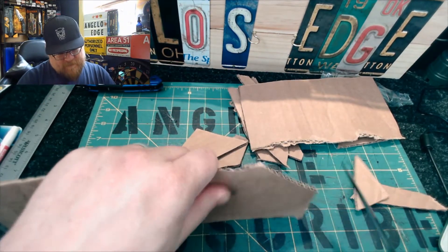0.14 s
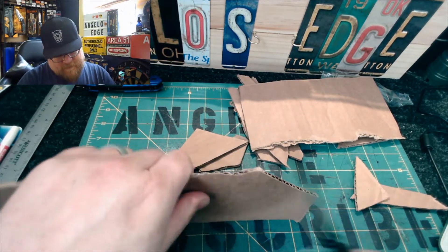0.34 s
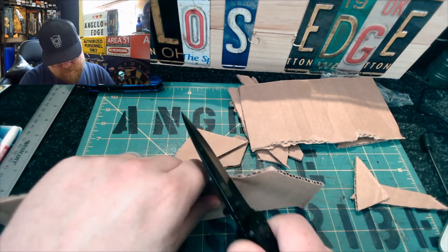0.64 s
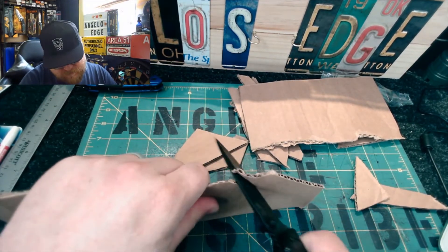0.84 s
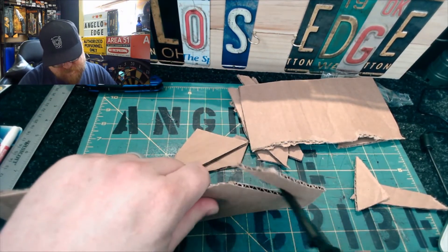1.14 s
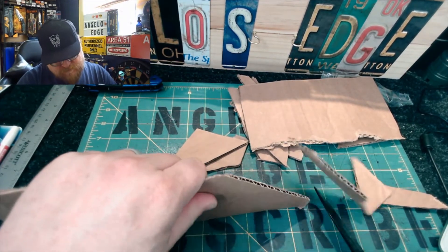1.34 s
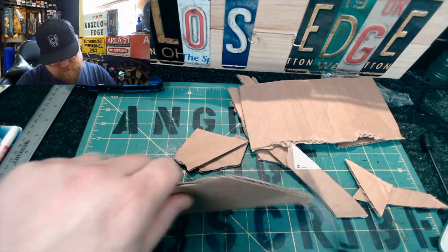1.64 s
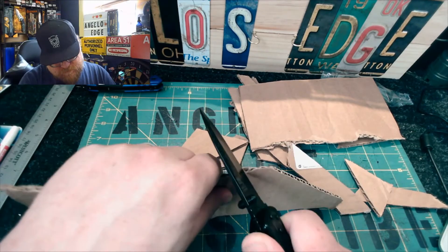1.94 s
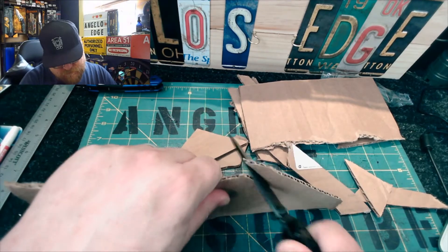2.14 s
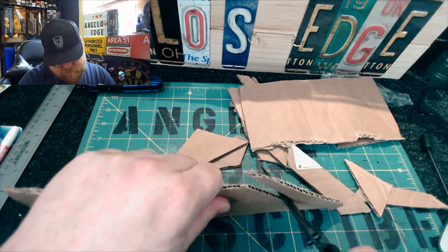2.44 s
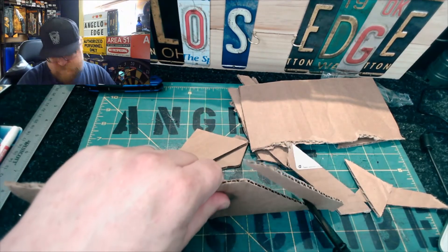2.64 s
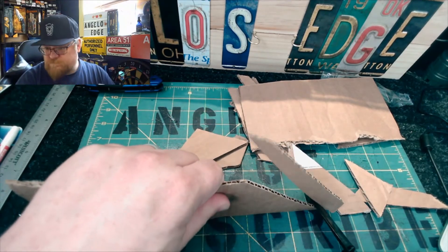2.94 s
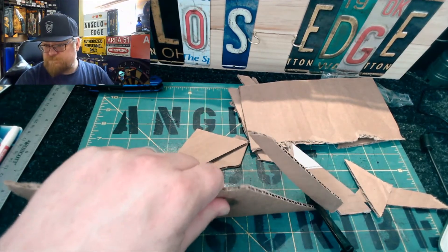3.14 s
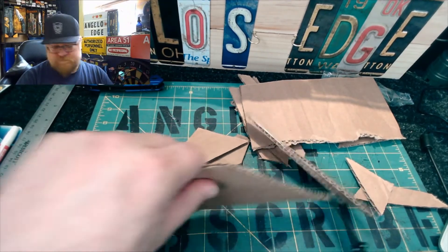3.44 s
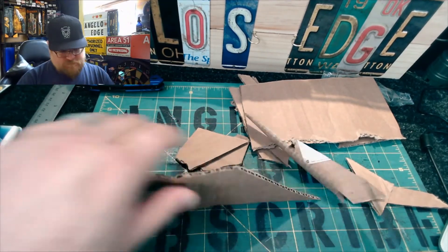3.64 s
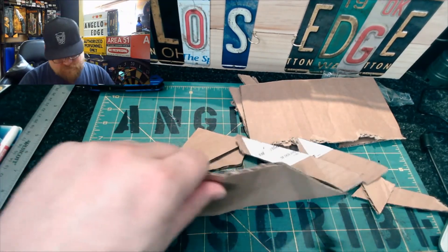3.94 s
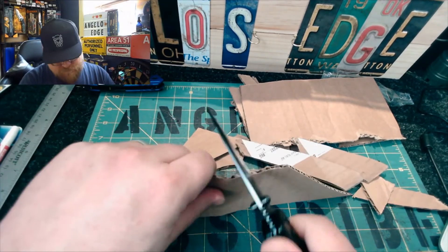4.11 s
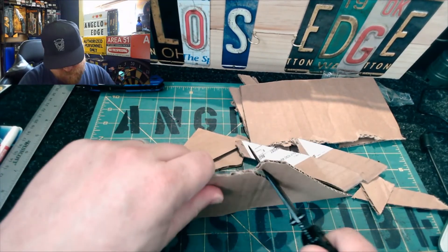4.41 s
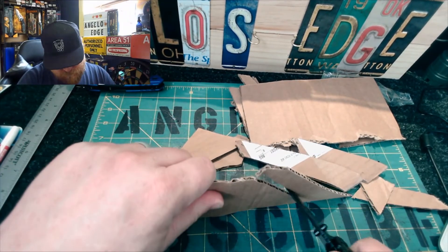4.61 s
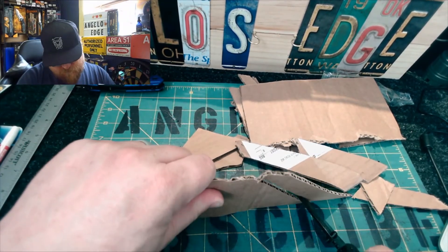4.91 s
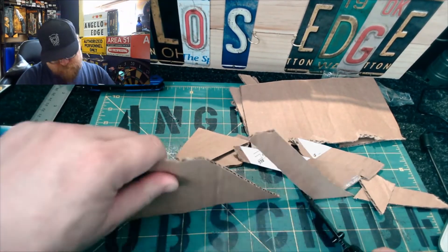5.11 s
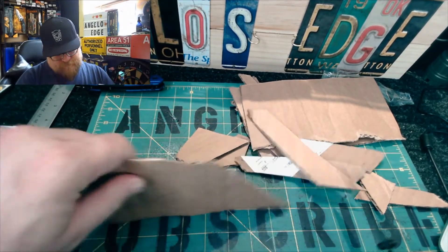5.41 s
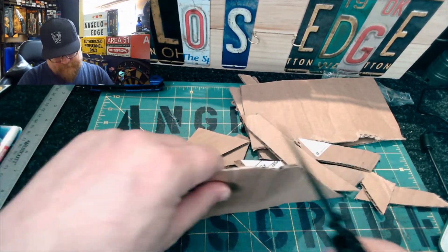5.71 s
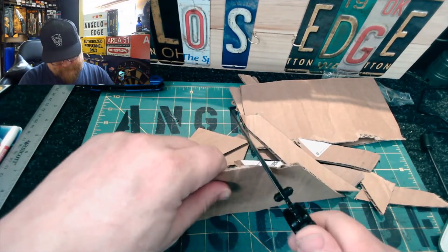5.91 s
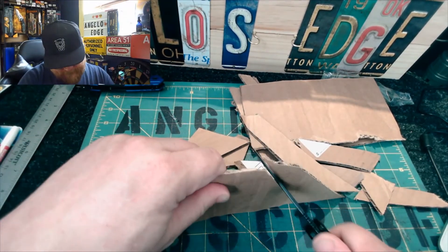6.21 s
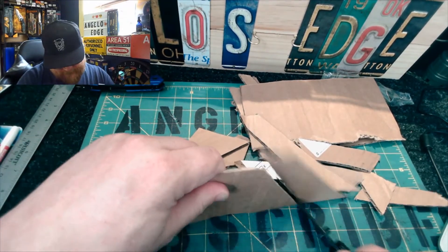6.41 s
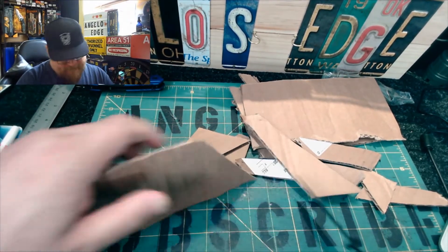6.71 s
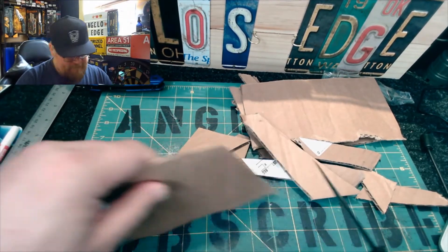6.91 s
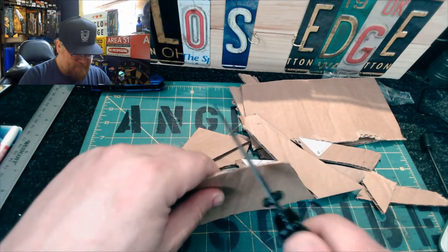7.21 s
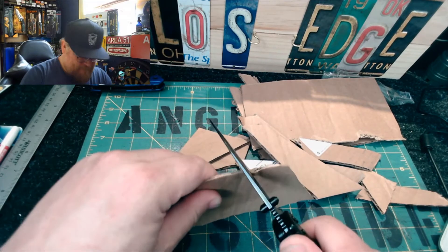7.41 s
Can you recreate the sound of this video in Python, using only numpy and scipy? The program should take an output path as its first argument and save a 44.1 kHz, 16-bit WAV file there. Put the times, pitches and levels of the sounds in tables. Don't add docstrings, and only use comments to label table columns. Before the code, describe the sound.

Close to a stereo microphone in a quiet room, a knife slices corrugated cardboard on a desk. Gritty crackling rasps swell at each flute, pause, then start again. Small tips snap off, offcuts drop and slide, and palms thump the desk softly over a low hand rumble. The sharpest, loudest crack comes shortly after six seconds, followed by lighter ticks and short cuts.

```python
import sys
import numpy as np
from scipy import signal
from scipy.io import wavfile
from scipy.ndimage import uniform_filter1d

SR = 44100
rng = np.random.default_rng(int(sys.argv[2]) if len(sys.argv) > 2 else 0)


def to_wav(s):
    ch = np.atleast_2d(s).T
    pcm = np.round(np.clip(ch, -1, 1) * 32767)
    wavfile.write(sys.argv[1], SR, pcm.astype(np.int16))


def convert_level_to_amplitude(level_db):
    exponent = np.asarray(level_db, float) / 20
    return 10 ** exponent


N = 333287

# (f/Hz, width/Hz, level/dB)
DESK_MODES = [(108, 30, -1.5), (135, 35, 2.5), (168.6, 36.8, -2.5), (244, 23, -11), (314.2, 24.6, -8.5),
              (399, 23, -9), (465, 57, -15.5)]


def evened(x):
    return x / np.sqrt(np.mean(x ** 2) + 1e-20)


def read(points, hz):
    f, value = np.transpose(points)
    return np.interp(np.log(hz + 1), np.log(f + 1), value)


def colour(x, points):
    hz = abs(np.fft.fftfreq(8192, 1 / SR))
    log_gain = np.log(np.maximum(convert_level_to_amplitude(read(points, hz)), 1e-4))
    taps = np.fft.ifft(np.exp(np.conj(signal.hilbert(log_gain)))).real[:4096]
    return signal.oaconvolve(x, taps)[:len(x)]


def resonate(x, hz, width):
    r = np.exp(-np.pi * width / SR)
    turn = np.exp(2j * np.pi * hz / SR)
    return 2 * signal.lfilter([1 - r], [1, -r * turn], x + 0j).real


def ring(x, modes):
    total = np.zeros(len(x))
    for k, (hz, width, db) in enumerate(modes):
        total += (-1) ** k * convert_level_to_amplitude(db) * resonate(x, hz, width)
    return evened(total)


def drift(seconds):
    size = max(round(seconds * SR), 2)
    return evened(uniform_filter1d(uniform_filter1d(rng.standard_normal(N), size), size))


def patches(hz, seconds, size=256):
    field = rng.standard_normal((N * 4 // size + 9, size // 2 + 1))
    field = uniform_filter1d(field, max(round(seconds * SR * 4 / size), 1), axis=0)
    return evened(uniform_filter1d(field, max(round(hz * size / SR), 1), axis=1)).T


def reshape(x, gain, size=256):
    overlap = size * 3 // 4
    z = signal.stft(x, nperseg=size, noverlap=overlap)[2]
    return signal.istft(z * gain[:, :z.shape[1]], nperseg=size, noverlap=overlap)[1][:N]


def room_tone():
    # (f/Hz, level/dB)
    floor = [(18, -37), (30, 1), (81, -27.5), (124, -30), (374, -33.5), (666, -32.5), (1960, -45),
             (16000, -50)]
    return convert_level_to_amplitude(-56.5) * evened(colour(rng.standard_normal(N), floor))


def effort():
    # (start t/s, length/s, edge hiss level/dB, desk weight/dB, hiss dullness/dB)
    strokes = [(0, 0.12, -52, -49, 7.5), (0.488, 0.253, -38, -1.5, -2), (0.783, 0.3, -43, 7.5, -0.5),
               (1.08, 0.25, -65.5, 10, 10.5), (1.45, 0.28, -58, -11, 3), (1.81, 0.393, -42.5, 3.5, -0.5),
               (2.243, 0.17, -38, -0.5, -10.5), (2.399, 0.43, -52, 1, -1.5), (2.825, 0.22, -53, -3, 7),
               (3.19, 0.25, -52.5, -5, 4.5), (3.981, 0.43, -43.5, 2, 0), (4.249, 0.34, -40.5, 2, -7),
               (4.575, 0.34, -51, 2, 2), (4.897, 0.12, -53.5, -5, 6.5), (5.218, 0.28, -45, -8.5, 4.5),
               (5.684, 0.214, -54.5, 11, -0.5), (5.95, .27, -35, 4, -4.5), (6.226, .13, -43, -3, 9.5),
               (6.62, .28, -54.5, -1.5, 8), (7.047, 0.26, -49, 3.5, -0.5), (7.334, 0.3, -57, -6, -9),
               (7.503, .2, -44.5, -7.5, 1)]
    # (peak t/s, build-up/s, edge hiss level/dB, desk weight/dB)
    pushes = [(.104, 0.02, -49.5, -4), (.191, .032, -41, -8), (.414, 0.029, -47, -3),
              (.476, 0.024, -39, -3), (.823, 0.059, -26.5, -6), (1.05, 0.017, -26.5, -23),
              (1.167, 0.02, -43, 2.5), (1.526, 0.14, -49, -2.5), (1.688, 0.0095, -51.5, 5),
              (1.75, 0.0067, -41.5, -1), (1.795, 0.011, -30, -5), (1.873, 0.01, -38, 2),
              (1.996, 0.018, -30, -15), (2.135, .05, -33, 2.5), (2.35, 0.054, -31, -3),
              (2.68, 0.034, -32.5, -4.5), (3.557, 0.078, -45, -1), (4.126, 0.079, -24, -1.5),
              (4.386, 0.0088, -34, -2), (4.501, .015, -42, -6), (4.626, 0.023, -38.5, -0.5),
              (5.122, 0.018, -45, -36), (5.274, 0.19, -50.5, 1), (6.498, 0.016, -50.5, -16),
              (6.729, 0.083, -42.5, -15), (7.202, 0.023, -28.5, -7.5)]
    # (peak t/s, trail/s, edge hiss level/dB, desk weight/dB)
    catches = [(.154, 0.12, -49, -8), (.512, 0.017, -29.5, -2), (.606, 0.064, -37, 1.5),
               (.858, 0.056, -27.5, -5.5), (1.186, 0.065, -39.5, -8), (1.198, 0.025, -30, -9),
               (1.613, 0.051, -48.5, -15), (1.774, 0.052, -42.5, 2.5), (1.925, 0.076, -26.5, 2.5),
               (2.421, 0.021, -37.5, -3), (3.018, 0.049, -40, 5), (3.074, 0.066, -44.5, -26),
               (3.598, 0.17, -39.5, -20), (3.818, 0.11, -55, -21), (4.16, 0.014, -33, -4),
               (4.202, 0.063, -36, -7), (4.276, 0.018, -31, 3.5), (4.686, 0.11, -36, -4.5),
               (4.73, 0.072, -34, -3), (5.178, 0.035, -41, -15), (5.242, 0.019, -40, -9),
               (5.428, 0.043, -62, -8), (5.707, 0.16, -40, -10), (5.862, 0.017, -47, 1),
               (6.264, 0.025, -33, -4), (6.388, 0.076, -44, -7), (7.03, 0.063, -72, -7),
               (7.115, 0.23, -55, -13), (7.288, 0.013, -39.5, -29)]
    # (peak t/s, half width/s, edge hiss level/dB, desk weight/dB)
    bites = [(.441, 0.0096, -40.5, -2), (.96, 0.067, -26.5, -19), (1.365, .012, -49.5, 3),
             (1.723, 0.0065, -44, -3.5), (1.905, 0.014, -27, -5), (2.47, 0.014, -29, -6.5),
             (2.527, 0.039, -36.5, -3.5), (2.598, 0.019, -31.5, -5.5), (3.17, 0.023, -48, -18),
             (3.283, 0.03, -43.5, 3), (3.547, 0.0068, -29.5, -31), (4.017, 0.007, -32.5, -8),
             (4.239, 0.011, -32.5, -10), (4.764, 0.0092, -21, 0.5), (4.841, 0.034, -29, -8.5),
             (5.015, 0.062, -45.5, -3), (5.968, .023, -36, -1), (5.999, 0.059, -33, 4.5),
             (6.142, .12, -29, -2.5), (6.285, 0.041, -38, -4), (6.541, 0.031, -51, 7.5),
             (6.605, 0.0098, -44.5, 3), (6.65, 0.012, -40.5, -5), (6.797, 0.056, -46, -9),
             (7.129, 0.0035, -34, -20), (7.385, 0.015, -56, 1), (7.423, 0.0082, -56, -15)]
    # (start t/s, length/s, edge hiss level/dB, desk weight/dB)
    rips = [(0.504, 0.076, -35, 4.5), (0.598, 0.089, -35, -3.5), (0.907, 0.037, -31, -32),
            (1, 0.058, -28.5, -32), (2.733, 0.05, -36.5, -5), (4.326, 0.025, -29.5, -1),
            (4.409, 0.04, -32, -1), (4.48, .04, -31.5, 0), (4.532, 0.027, -32, -3), (5.79, 0.037, -25, 0.5),
            (5.83, 0.029, -33.5, 2.5), (5.939, 0.021, -41, -11), (7.238, 0.038, -34.5, -1),
            (3.593, 0.13, -50, -8), (3.954, 0.0088, -32, -8), (3.982, .012, -34, -2),
            (3.459, .014, -47.5, -7), (6.259, 0.014, -35, -3), (2.061, 0.163, -36, 0.5),
            (2.27, 0.1226, -32.5, -5)]
    # (peak t/s, half width/s, edge hiss level/dB, sheet over edge/dB, dullness/dB)
    landings = [
        (1.098, 0.014, -49, 5.5, -5),
        (1.305, .006, -46.5, -15, 7),
        (1.406, 0.0023, -32, 3, 4),
        (1.415, 0.0065, -20.5, -1.5, 13.5),
        (1.43, 0.021, -40.5, 0, 9),
        (3.017, 0.015, -24, -11, -4),
        (3.344, 0.0041, -43.5, 8.5, -3),
        (3.399, .003, -42, 3, 8),
        (1.49, .01, -54, 3, 7),
        (6.728, .004, -38, -5, 6.5),
    ]
    slide_sheet_db, bite_sheet_db = -3.5, -7
    bite_rise = 0.81
    t = np.arange(0, N + 44, 44) / SR

    def layers(edge_db, sheet_db, weight_db):
        return convert_level_to_amplitude(edge_db + np.array([[0], [sheet_db + 0.21 * weight_db], [weight_db]])) ** 2

    def hold(start, length, ramp):
        return np.clip(np.minimum(t - start, start + length - t) / ramp + .5, 0, 1) ** 2

    def bell(at, rise, fall):
        flank = np.hypot(np.where(t < at, rise, fall), 0.0027)
        return 10 ** -((t - at) / flank) ** 2

    power = layers(-64, slide_sheet_db, 1.5) * np.ones(len(t))
    dull = power[0] * 5.5
    contacts = []
    for start, length, db, weight, dull_db in strokes:
        contacts.append((layers(db, slide_sheet_db, weight) * hold(start, length, 0.039), dull_db))
    for at, half, db, sheet_db, dull_db in landings:
        contacts.append((layers(db, sheet_db, -20) * bell(at, bite_rise * half, half), dull_db))
    for part, dull_db in contacts:
        power += part
        dull += part[0] * dull_db
    dull_db = dull / power[0]
    for start, length, db, weight in rips:
        power += layers(db, bite_sheet_db, weight) * hold(start, length, 0.0036)
    for rows, rise, fall in ((pushes, 1, 0.24), (catches, 0.16, 1), (bites, bite_rise, 1)):
        for at, length, db, weight in rows:
            power += layers(db, bite_sheet_db, weight) * bell(at, rise * length, fall * length)
    return [np.interp(np.arange(N) / SR, t, v) for v in (*np.sqrt(power), dull_db)]


def fibres(per_s, spread_db, clump_db, clump_s):
    breaks = (rng.random(N) < per_s / SR) * rng.standard_normal(N)
    size = convert_level_to_amplitude(spread_db * np.minimum(rng.exponential(1, N), 5))
    return evened(breaks * size * convert_level_to_amplitude(clump_db * drift(clump_s)))


def cutting(edge, sheet, desk, dull_db):
    # (f/Hz, level/dB)
    edge_spectrum = [(1650, -49), (2800, -10), (3560, -10), (5480, -4.5), (6340, -5), (8990, 1.5),
                     (10800, 1.5), (15100, -2)]
    # (f/Hz, width/Hz, level/dB)
    sheet_modes = [(644, 93, 6), (904, 107, 4.5), (1010, 95, 7), (1347, 250, 4.5), (1684, 240, 5.5),
                   (2320, 740, 2.5)]
    tear = fibres(per_s=18000, spread_db=2.0, clump_db=1.3, clump_s=0.007)
    slips = fibres(per_s=700, spread_db=2.0, clump_db=-1.0, clump_s=0.0022)

    hiss = colour(tear, edge_spectrum)
    lower = signal.sosfilt(signal.butter(2, 6800, fs=SR, output="sos"), hiss)
    dull = convert_level_to_amplitude(dull_db)
    hiss = edge * evened(hiss + (dull - 1) * lower) / np.sqrt(0.55 + 0.1 * dull ** 2)

    panel = ring(sheet * evened(tear + 0.36 * slips), sheet_modes) * np.sqrt(np.mean(sheet ** 2))
    top = ring(desk * slips, DESK_MODES)
    ringing = uniform_filter1d(top ** 2, 3000) + 1e-12
    load = uniform_filter1d(np.roll(desk, 300) ** 2, 3000) + 1e-12
    top = top * np.sqrt(load / ringing)

    swing = top / np.sqrt(load + uniform_filter1d(edge ** 2, 3000) / 2)
    hiss = hiss * convert_level_to_amplitude(1 * np.tanh(swing))

    shifting = convert_level_to_amplitude(2.0 * patches(hz=500, seconds=0.072) + 0.98 * patches(hz=2590, seconds=0.016))
    narrow = convert_level_to_amplitude(2.4 * patches(hz=130, seconds=.2, size=1024))
    rasp = reshape(hiss + convert_level_to_amplitude(-0.75) * panel, evened(shifting))
    return reshape(rasp, evened(narrow), size=1024) + convert_level_to_amplitude(-2.8) * top


def hands(desk):
    # (f/Hz, level/dB)
    rumble = [(12, -51), (25, -5.5), (60, -1), (85, -5.5), (110, -31.5)]
    lumps = colour(rng.standard_normal(N), rumble)
    load = np.sqrt(abs(uniform_filter1d(desk ** 2, 1500)))
    return convert_level_to_amplitude(-13.5) * load ** 0.83 * evened(lumps)


def snaps():
    # (t/s, peak level/dB, f/Hz, desk thud over peak/dB, share of wide crackle 0-1)
    tips = [(0.3819, -19, 2650, -26, 0.76), (1.1252, -29.5, 9600, -13, 0.3), (1.1795, -27, 3270, -28, 0.65),
            (2.876, -25, 5640, -22, 0.83), (3.1707, -20.5, 6400, -29, 1), (3.3897, -24, 1150, -0.5, 0.29),
            (3.462, -36, 3700, -32, 0.2), (3.9566, -31, 2600, -3, 0.46), (3.936, -42, 5000, -30, 0.7),
            (5.678, -13.5, 4890, -26, 0.93), (5.7487, -28, 7080, -22, 0.4), (6.214, 1.5, 4500, -22.5, 0.72),
            (6.3933, -27, 5160, -18, 0.5), (6.6389, -22, 3860, -20, 0.86), (6.996, -29.5, 5660, -38, 0.73),
            (7.0261, -22, 2010, -29, 0.7), (7.0436, -12, 3370, -26, 0.89), (7.115, -22, 6160, -33, 0.45),
            (7.1243, -14.5, 5460, -40, 1), (1.347, -37, 12000, -30, 0.6), (1.357, -33, 9000, -14, 0.6),
            (1.367, -36, 5500, -25, 0.7), (3.014, -13, 9050, -21.5, 0.5), (7.045, -27, 8500, -30, 0.6)]
    size = 2000
    out, push, t = np.zeros(N + size), np.zeros(N), np.arange(size) / SR
    decay = convert_level_to_amplitude(-60 * t / 0.025) + 0.4 * convert_level_to_amplitude(-60 * t / 0.0071)
    for s, db, hz, thud_db, wide in tips:
        burst = rng.standard_normal(size) * decay
        burst[:2] = -4.5, 3.5
        wide = np.clip(wide, 0, 1)
        crackle = evened(signal.lfilter([1, -1], [1, -.6], burst))
        pitched = evened(resonate(resonate(burst, hz, 0.15 * hz), hz, 1.5 * hz))
        crack = wide * crackle + (1 - wide) * pitched
        at = round((s + .0017) * SR)
        out[at:at + size] += convert_level_to_amplitude(db) * crack / abs(crack).max()
        push[at] = -convert_level_to_amplitude(db + thud_db)
    thud = np.zeros(N)
    for hz, width, db in DESK_MODES:
        thud += convert_level_to_amplitude(db) * resonate(push, hz, width) * SR / (2 * np.pi * width)
    knock = np.convolve(push, np.hanning(30))[:N]
    return out[:N] + convert_level_to_amplitude(-7.0) * thud + convert_level_to_amplitude(-17.0) * knock


def thumps():
    # (t/s, peak level/dB, f/Hz, t60/s)
    blows = [(0.384, -38.5, 71, 0.038), (1.09, -23.5, 35.5, .16), (1.368, -33.5, 129, 0.062),
             (3.022, -20.5, 126, 0.1), (3.285, -34.5, 108, .12), (3.957, -32.5, 60, 0.2),
             (4.765, -16.5, 166, 0.12), (6.534, -35.5, 108, 0.13), (7.044, -33, 57, 0.12),
             (7.196, -28.5, 115, 0.1), (7.246, -27, 125, 0.17), (1.63, -52, 50, .12), (1.69, -43, 60, .12),
             (1.79, -31, 50, 0.11), (3.1, -39, 50, 0.22), (4.272, -21.5, 135, 0.12), (4.92, -45, 60, .2),
             (0.789, -38, 58.5, .15), (5.674, -31, 76, 0.09), (.435, -34, 90, 0.087),
             (3.4, -34.5, 109, 0.13)]
    size = 9000
    out, t = np.zeros(N + size), np.arange(size) / SR
    for s, db, hz, t60 in blows:
        swing = np.sin(2 * np.pi * hz * t) * convert_level_to_amplitude(-60 * t / max(t60, .02))
        swing *= 1 - np.exp(-t / 0.0025)
        out[round(s * SR):][:size] += convert_level_to_amplitude(db) * swing / abs(swing).max()
    return out[:N]


def near_reflections(x):
    t = np.arange(6000) / SR
    taps = rng.standard_normal(len(t)) * convert_level_to_amplitude(-60 * t / 0.11)
    return signal.oaconvolve(x, taps / np.linalg.norm(taps))[:N]


def stereo(mid):
    # (f/Hz, level/dB)
    side_spectrum = [(60, -9), (300, -13), (1000, -5.5), (2400, -4.5), (3500, -0.5), (7000, 1.5),
                     (8300, -7), (15000, -4.5)]
    # (f/Hz, level/dB)
    lean = [(60, 0), (1000, -1.2), (12000, -1.64)]
    fixed_share = .4
    moving = reshape(mid, np.exp(2j * patches(hz=700, seconds=.006)))
    moving *= np.sqrt(np.mean(mid ** 2) / np.mean(moving ** 2))
    side = colour(fixed_share * near_reflections(mid) + (1 - fixed_share) * moving, side_spectrum)
    return np.array([colour(mid + way * side, [(hz, way * db) for hz, db in lean]) for way in (1, -1)])


def scene():
    edge, sheet, desk, dull_db = effort()
    steady = room_tone() + cutting(edge, sheet, desk, dull_db) + hands(desk) + thumps()
    lowpass = signal.firwin(601, 15850, window=("kaiser", 8), fs=SR)
    return stereo(signal.oaconvolve(steady, lowpass, "same") + snaps())


def flickering_width(left, right):
    hz = np.fft.rfftfreq(1024, 1 / SR)[:, None]
    weak = ((hz > 1000) & (hz < 4300)) | (hz > 7600)
    kept = ~weak | (patches(hz=2500, seconds=.1, size=1024) > -1.0)
    mid, side = (left + right) / 2, reshape((left - right) / 2, kept, size=1024)
    return np.array([mid + side, mid - side])


def top_cut(x):
    return signal.sosfilt(signal.butter(12, 16980, fs=SR, output="sos"), x)


def record(dry):
    lowpass = signal.firwin(401, 16350, window=("kaiser", 9), fs=SR)
    left, right = signal.oaconvolve(np.tanh(dry), lowpass[None], "same")
    return top_cut(flickering_width(left, right))


dry = scene()
out = record(dry)
to_wav(out)
```